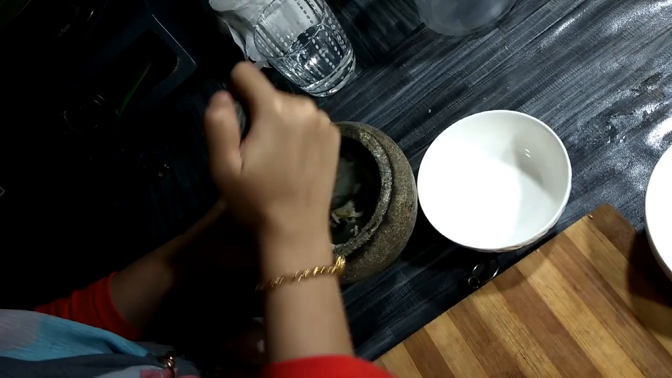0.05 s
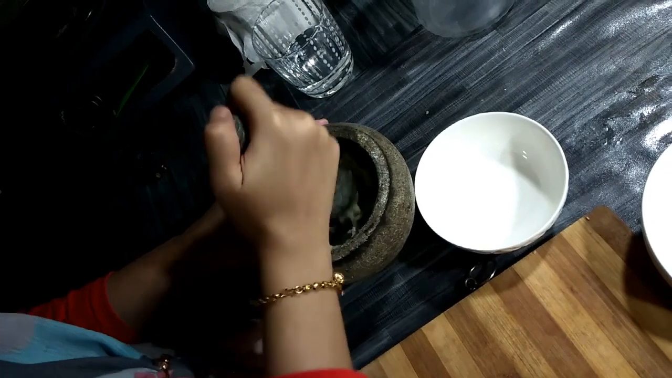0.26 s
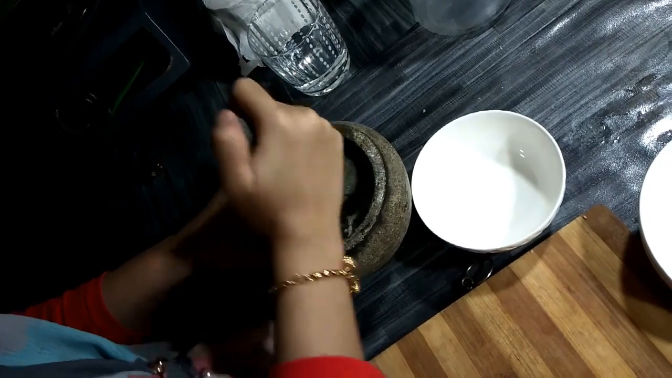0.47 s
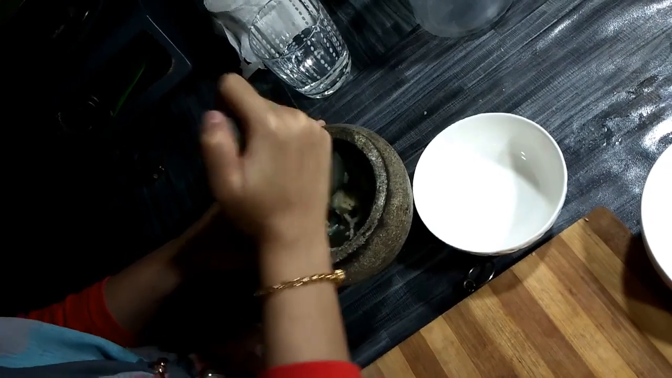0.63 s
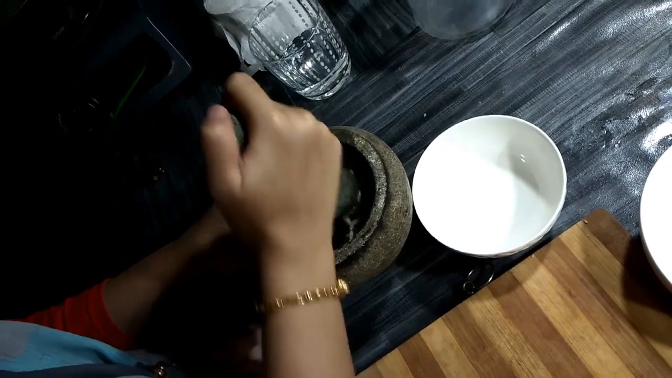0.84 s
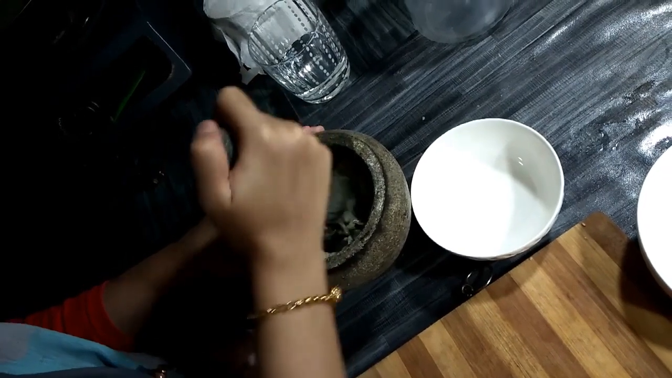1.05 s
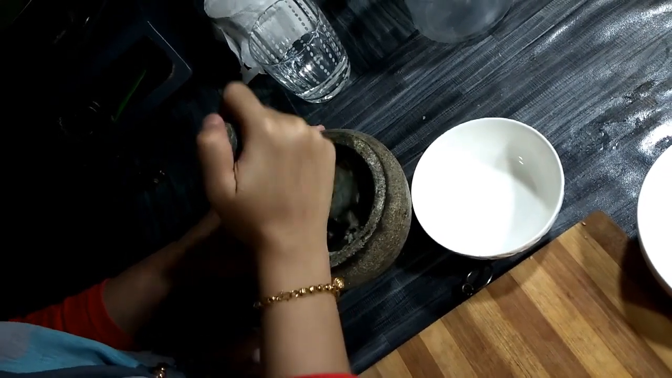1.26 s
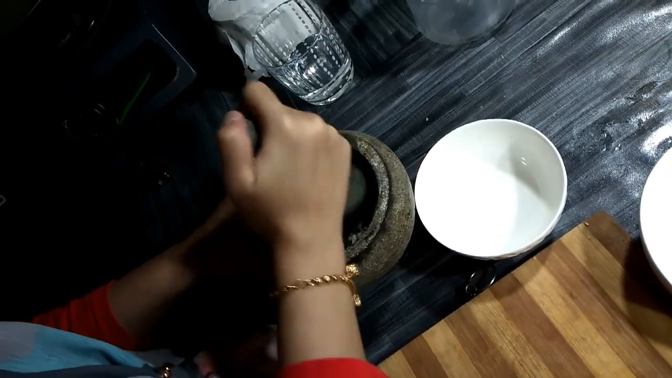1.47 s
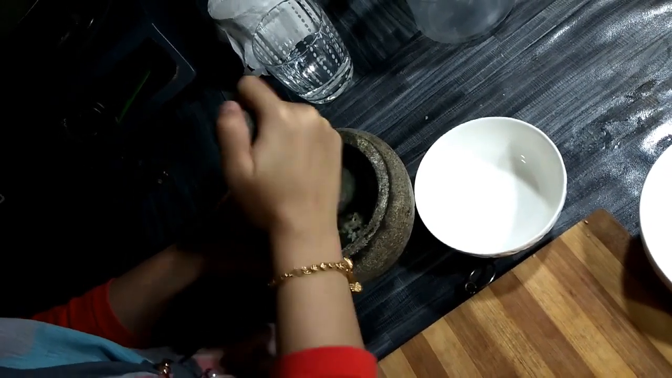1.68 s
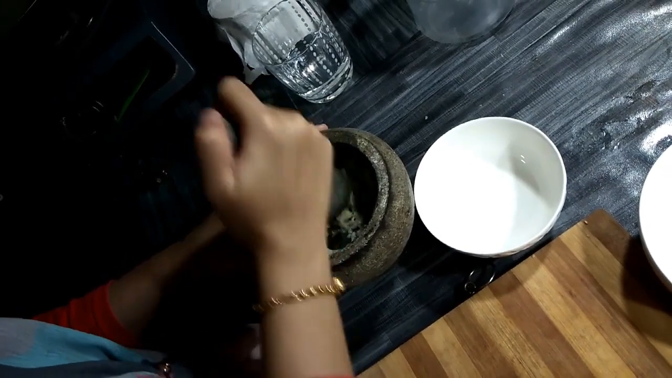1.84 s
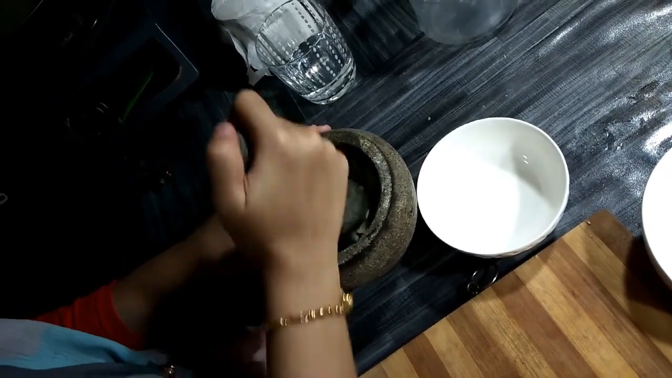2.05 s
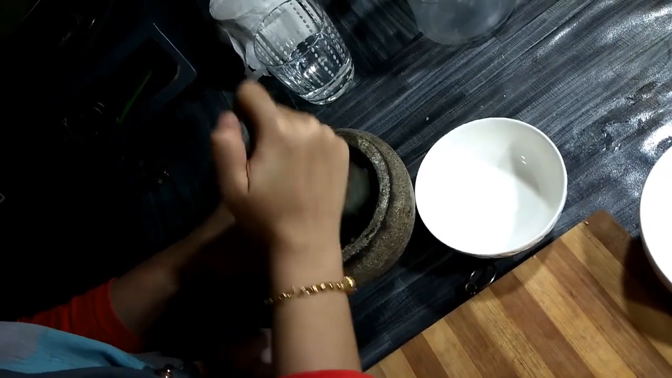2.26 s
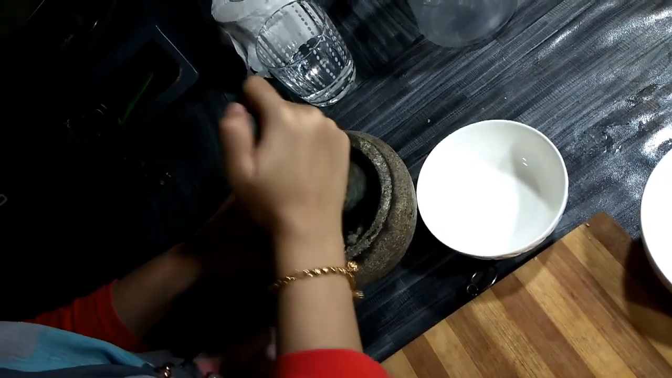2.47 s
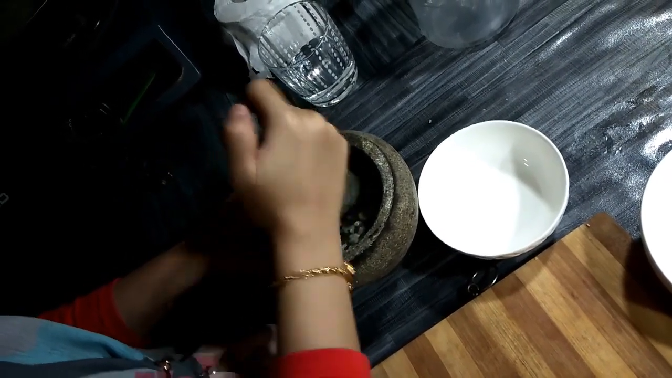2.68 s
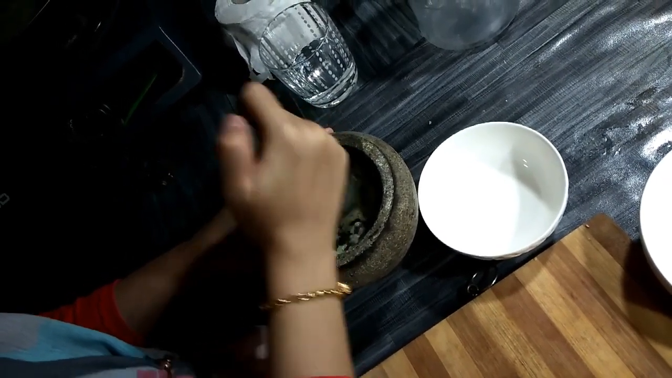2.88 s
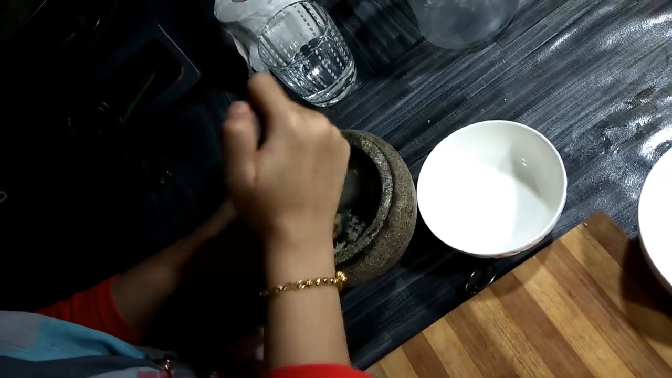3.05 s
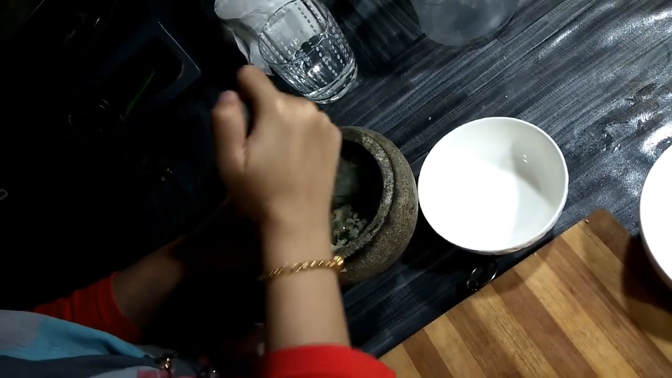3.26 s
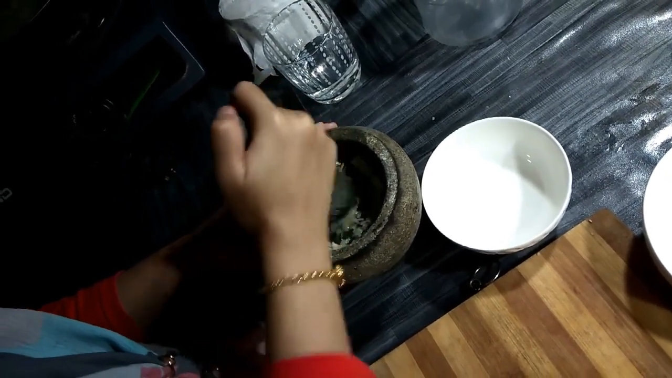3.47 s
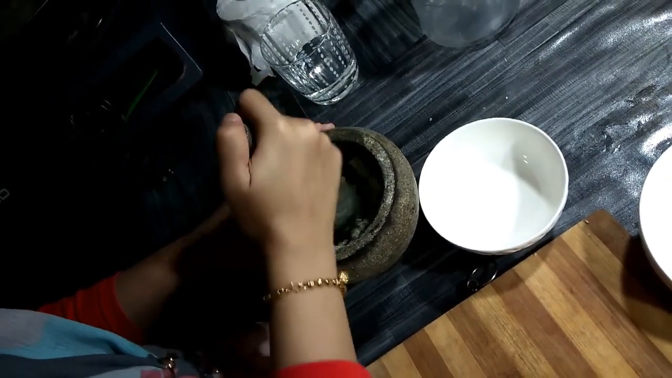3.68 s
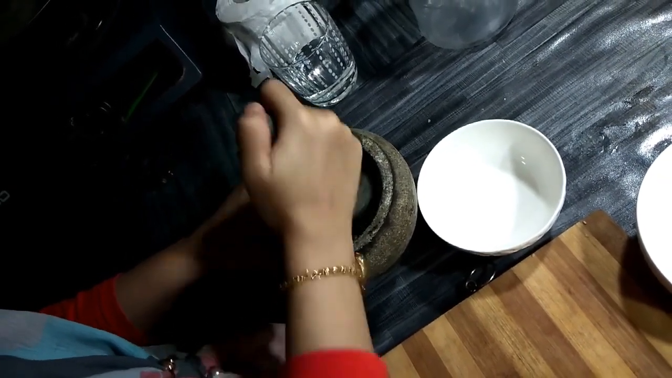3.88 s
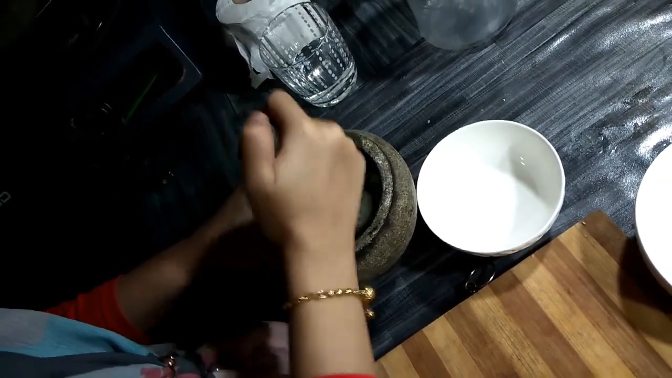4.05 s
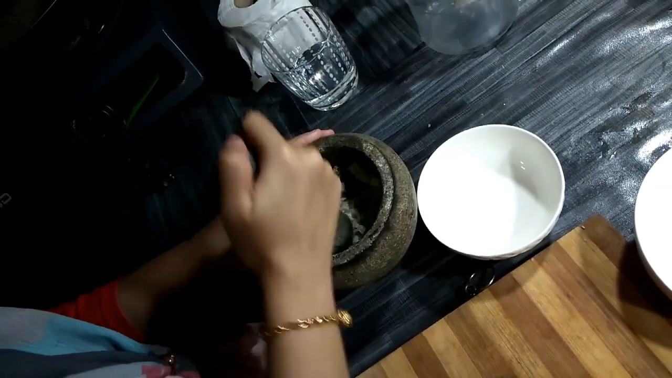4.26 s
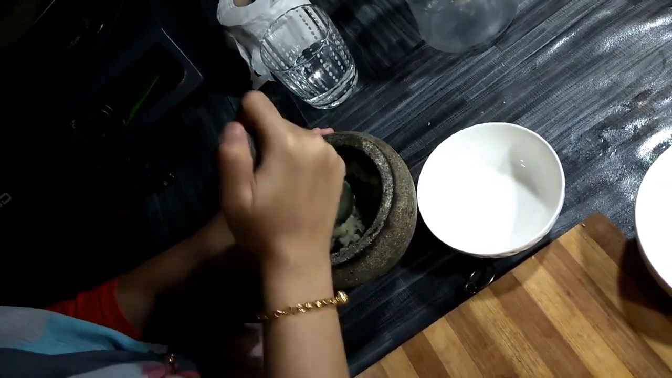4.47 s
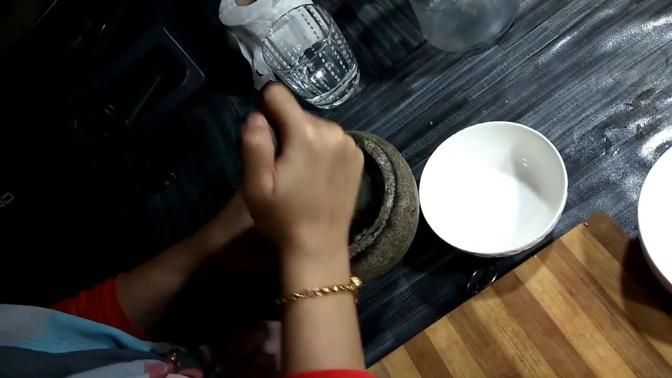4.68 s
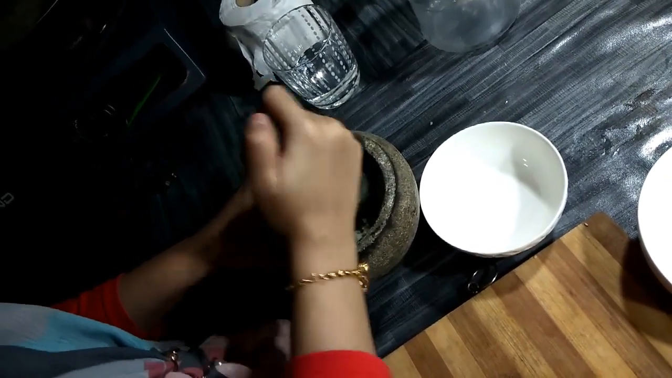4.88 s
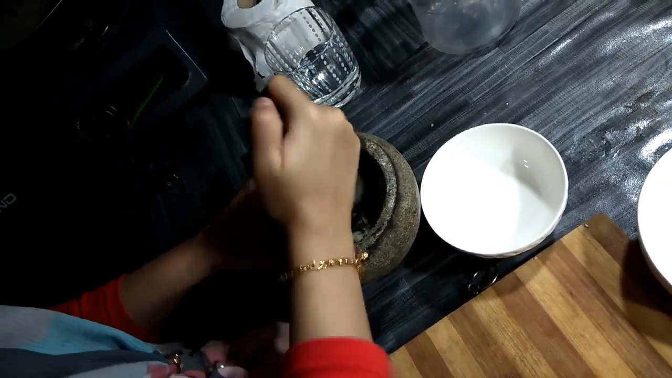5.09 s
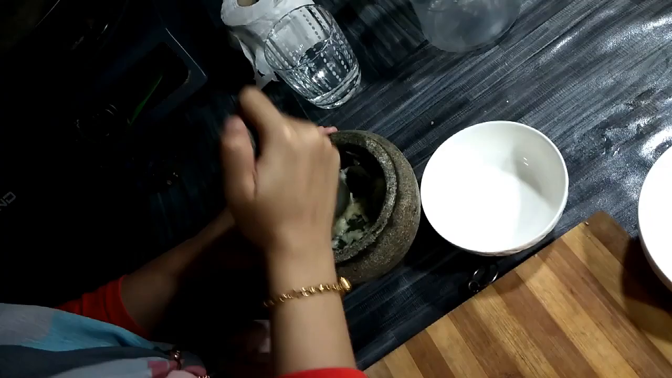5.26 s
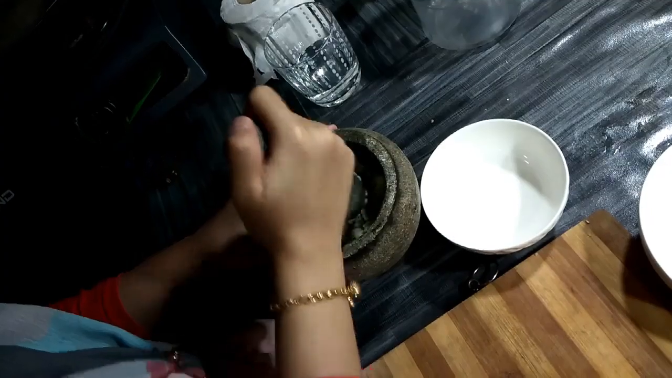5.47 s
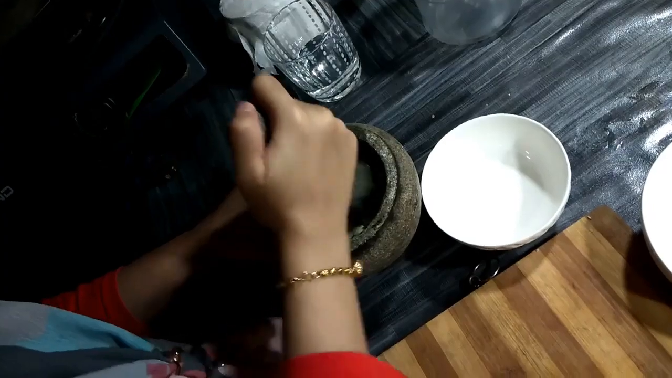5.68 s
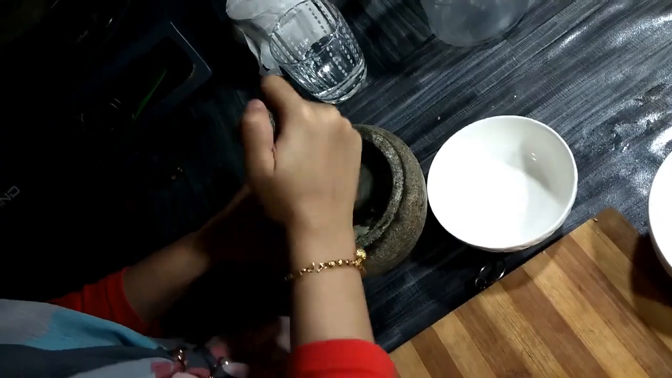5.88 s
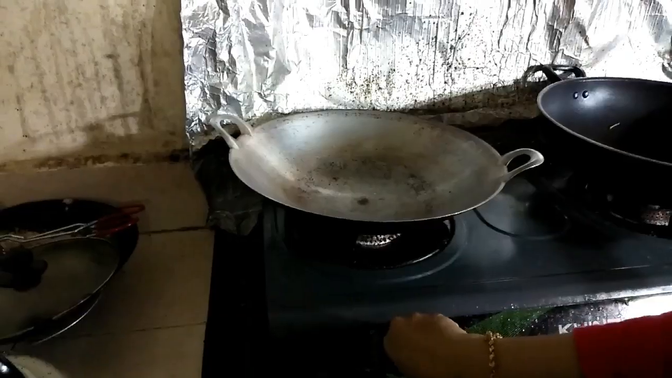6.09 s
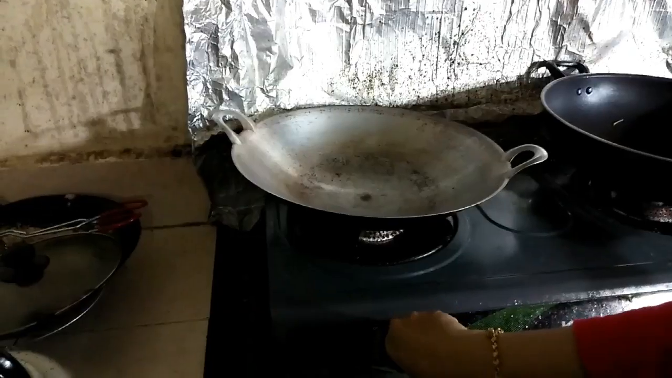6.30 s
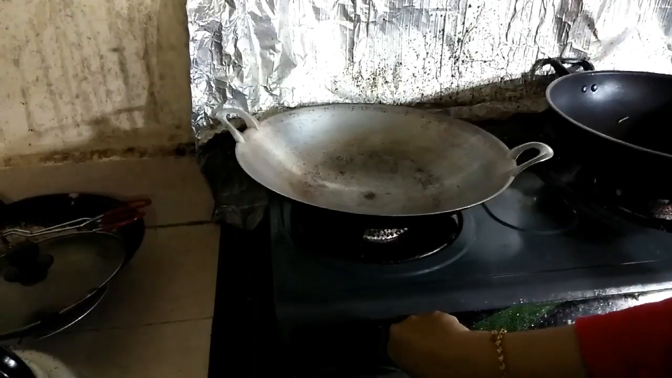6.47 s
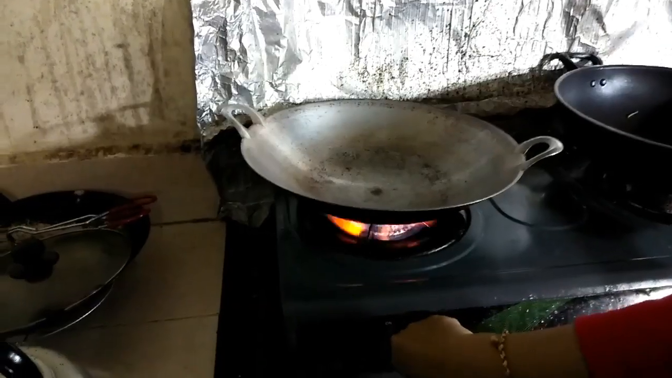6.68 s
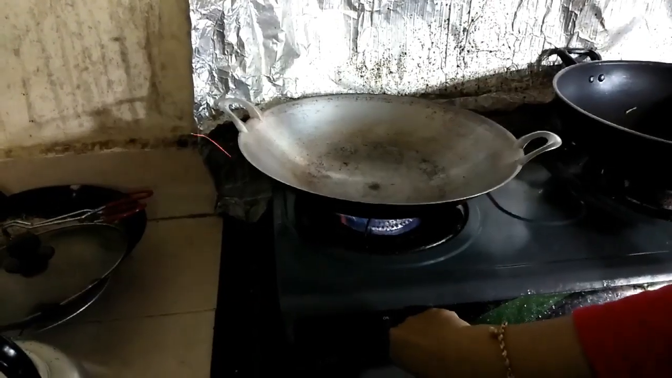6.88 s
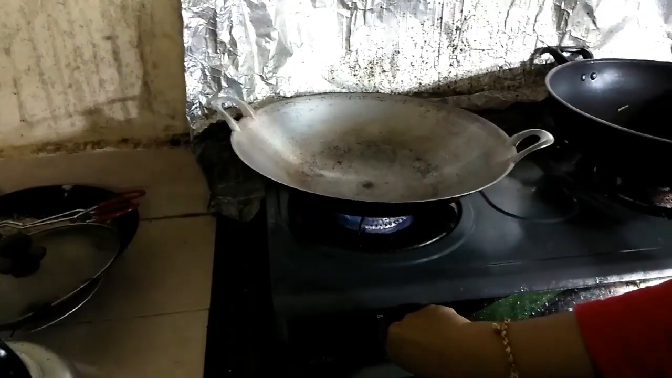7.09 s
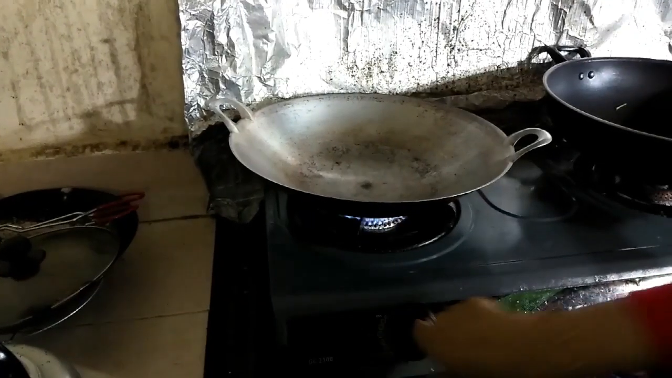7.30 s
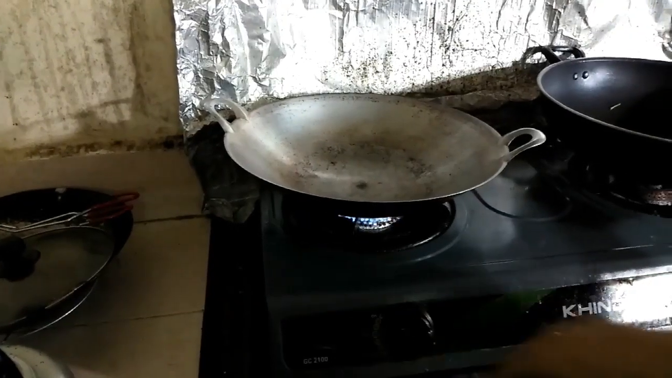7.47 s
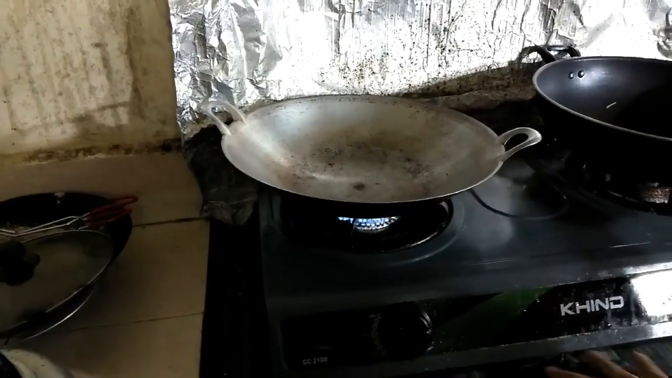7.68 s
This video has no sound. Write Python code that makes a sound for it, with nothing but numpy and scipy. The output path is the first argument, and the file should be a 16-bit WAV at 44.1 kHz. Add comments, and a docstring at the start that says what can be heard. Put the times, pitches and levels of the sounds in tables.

```python
"""Garlic mortar, then gas stove

Close at the table in a hard-walled kitchen, a pestle pounds garlic in a stone mortar, four strokes a second.
Each stroke is a noise crackle of pulp, a ringing table thud and a stone knock; a bracelet jingles after it.
The scene then cuts to the stove: the igniter snaps, the gas puffs and flares, the knob clacks and turns it down.
Shaped noise makes the hiss, flame and rattles; decaying sines make the rings; a faint whir runs throughout."""
import sys
import numpy as np
from scipy import signal
from scipy.fft import rfft, irfft, next_fast_len
from scipy.io import wavfile
from scipy.ndimage import map_coordinates

SR = 44100
rng = np.random.default_rng(int(sys.argv[2]) if len(sys.argv) > 2 else 0)


def inscribe(sig):
    """Save sig as 16-bit PCM at rate SR to the path in sys.argv[1].

    A 1-D sig is mono; a 2-D sig holds one channel per row.
    Samples are clipped to [-1, 1] before scaling.
    """
    pcm = np.round(np.clip(np.atleast_2d(sig).T, -1, 1) * 32767)
    wavfile.write(sys.argv[1], SR, pcm.astype(np.int16))


N = 341239

# Spectra are relative, since each noise is scaled to a set level; mode levels are relative within a body.
# steady hiss in both places: pitch_hz, density_db
HISS_SPECTRUM = [(25, -34), (60, -5), (100, 4), (150, 1.5), (280, -3.5), (500, -10.5), (1000, -17),
                 (1500, -10.5), (2300, -10), (3000, -11), (4000, -28), (5500, -18), (6300, -26),
                 (6800, -11.5), (7400, -24.5), (8300, -22.5), (10500, -36.5), (13500, -50), (15500, -41)]
# low drone that fills the room by the table: pitch_hz, density_db
DRONE_SPECTRUM = [(30, -3), (45, -7), (58, 32), (72, 15.5), (100, 10.5), (200, 24), (400, -46)]
# path of the whir by the stove: time_s, centre_hz
STOVE_WHIR_PATH = [(6.15, 1770), (6.49, 1942), (7.284, 1736), (7.738, 1820)]
# nearest kitchen walls: delay_s, relative_level_db
WALL_ECHOES = [(.0046, -9.5), (0.0116, -2.5), (0.011, -17.5), (0.0127, -11.5), (0.022, -14.5), (0.023, -53)]
# decay of the kitchen's diffuse tail: pitch_hz, t60_s
KITCHEN_DECAY = [(60, 0.88), (250, 0.6), (700, 0.57), (2000, 0.65), (4000, 0.56), (8000, 0.48),
                 (15000, 0.56)]
# gas catching light: pitch_hz, density_db
PUFF_SPECTRUM = [(40, -10), (65, -20), (110, 15), (160, -6), (400, -21), (1200, -50)]
# the burner's rush: pitch_hz, density_db
FLAME_SPECTRUM = [(35, -20), (60, 0), (150, -2), (330, 2.5), (520, -8.5), (700, 0), (900, -14),
                  (2000, -11.5), (5000, -41)]
# igniter and knob snaps at the stove: start_s, rattle_level_db, clack_level_db, rattle_cutoff_hz
STOVE_SNAPS = [(6.7336, -21, -42, 18000), (6.7429, -18.5, -51, 7000), (7.4369, -29, -29.5, 4100),
               (7.4472, -34.5, -28.5, 2500)]
# loose parts of the stove: pitch_hz, density_db
RATTLE_SPECTRUM = [(40, -25), (110, -24), (250, -6), (600, -7), (1400, 1), (2500, 2), (3300, -4),
                   (5200, -7.5), (8200, -3.5), (10500, -11), (13500, -24), (15500, -24)]
# the knob's hollow plastic clack: pitch_hz, density_db
KNOB_SPECTRUM = [(500, -27), (950, -34), (1300, -9), (1600, -2.5), (1850, 8), (2100, -4), (2700, -3),
                 (3700, -11.5), (5000, -56)]
# the stove's sheet steel: pitch_hz, level_db, t60_s
STEEL_MODES = [(998, -5, .09), (1798, 0, .03), (1940, -1, .025)]
# jolts that make the china bowl chime: start_s, level_db
CHINA_JOLTS = [(0.556, -50.5), (4.967, -38.5)]
# the china bowl next to the mortar: pitch_hz, level_db, t60_s
CHINA_MODES = [(1252, 0, .55), (3130, -9, .3)]
# the bracelet's small bell: pitch_hz, level_db, t60_s
BELL_MODES = [(2720, -9, .06), (3580, -15, .08), (4690, 0, .1), (4750, -4, .09), (5980, -8, .08),
              (7600, -13, .06), (9200, -16, .05), (12060, -19, .07), (14450, -21, .06)]
# the bell's clapper strikes twice after each landing: delay_s, relative_level_db
CLAPPER_STRIKES = [(.029, 9), (.042, 0.5)]
# the bracelet's chain links: pitch_hz, level_db, t60_s
LINK_MODES = [(5470, -2, .1), (8080, 0, .09)]
# pestle strokes, levels before each layer's trim:
# landing_s, crunch_level_db, thud_level_db, knock_level_db, contact_hardness_hz
PESTLE_STROKES = [ (.050, -40.5, -28, -51, 556), (0.293, -62, -30, -45, 543),
                  (0.5562, -42, -29.5, -45, 503.8), (.815, -44, -29, -30, 1660),
                  (1.060, -43.5, -27, -38, 564), (1.294, -41.5, -27, -23, 1790),
                  (1.540, -43.5, -29.5, -43, 533), (1.773, -42, -36, -60, 506), (2.039, -42, -26, -31, 850),
                  (2.283, -34.5, -33, -28.5, 4370), (2.527, -42, -31.5, -43.5, 700),
                  (2.787, -37.5, -28.5, -42, 570), (3.053, -40.5, -27.5, -46, 560),
                  (3.2847, -37, -29.5, -39.5, 500), (3.504, -44.5, -30.5, -35, 600),
                  (3.723, -57, -31.5, -26.5, 1280), (3.968, -40, -27.5, -39, 593.3),
                  (4.1965, -43, -36.5, -44, 2750), (4.414, -47, -32.5, -39.5, 2730),
                  (4.705, -41, -26.5, -29, 2362), (4.968, -40.5, -32, -48.5, 2330),
                  (5.2236, -38.5, -30, -47, 510), (5.485, -42, -27.5, -24.5, 2150),
                  (5.7275, -37, -28.5, -24.5, 2360), (5.969, -43.5, -29, -36, 584)]
# bursting garlic: pitch_hz, density_db
CRUSH_SPECTRUM = [(300, -49), (1200, 0.5), (2500, 0.5), (4200, -7), (5800, -2.5), (7100, 0.5), (8200, -3),
                  (10500, -9), (13000, -20.5), (15500, -15.5)]
# the table under the mortar: pitch_hz, level_db, t60_s
TABLE_MODES = [(60.7, 1, 0.37), (75, 3, 0.097), (106.5, 0.5, 0.17), (140, -3.5, 0.35), (163.2, -35, 1),
               (231.2, -11, 0.51), (296, -33, 0.13)]
# the table top shuddering under the rocking mortar: pitch_hz, density_db
SHUDDER_SPECTRUM = [(70, -12), (150, 3.5), (240, -3), (330, 3.5), (420, -16.5), (490, -7.5), (700, -21.5),
                    (1000, -20.5), (2000, -56)]
# the dense, dead clack of stone on stone: pitch_hz, density_db
CLACK_SPECTRUM = [(40, -6.5), (130, -1.5), (290, 0), (550, -3.5), (760, 1.5), (1080, -4.5), (1300, 0.5),
                  (1800, 2), (2050, 1), (2450, 3.5), (2620, -1), (3200, -5), (3450, -20), (12000, -17.5)]
# brief ring of mortar and pestle: pitch_hz, level_db, t60_s
STONE_MODES = [(277.96, -8, 0.052), (671.3, -7, 0.11), (793, -6, 0.1), (885, -17, 0.04), (1273, 2, 0.066),
               (1423, 10, 0.02), (1930, -17, 0.046), (2016, 0.5, 0.061), (2211, 13.5, 0.016),
               (2314, 11, 0.046), (2490, -1, 0.07), (2700, -15, 0.13)]

STOVE_S = 6.13  # the scene moves from table to stove
TOP_HZ = 15700  # microphone's band limit
# the whir by the table: centre, random wander as a share of it, knots a second in the wander, level
WHIR_HZ, WHIR_WANDER, WANDER_PER_S, WHIR_DB = 1610, 0.043, 3.22, -49.5
STOVE_WHIR_DB = -51.5
# the flame: mean steady level, extra level of the flare, rise and settling times
FLAME_DB, FLARE_DB, CATCH_S, SETTLE_S = -48.5, 18.5, 0.025, 0.11
# the last snap turns the gas down by this much, with this time constant
TURN_DOWN_DB, TURN_DOWN_S = 12, .12
# the bell: level under an ordinary thud, and the dB it gains for each dB of thud
BELL_DB, ORDINARY_THUD_DB, BELL_GROWS = -62.5, -28.5, 2.8
# chain tinkles: mean level and random spread
LINKS_DB, LINKS_SPREAD_DB = -68, 3.5
TRAVEL_S = .0028  # the pestle's way through the garlic; thuds weaker than ordinary shorten it
ROCK_S = 0.02933  # the mortar rocks back onto the table this long after a landing
# crunch cutoff at an ordinary level, and dB of cutoff per dB of crunch: a firm clove breaks louder and brighter
CRISP_HZ, ORDINARY_CRUNCH_DB, CRISP_GROWS = 8600, -41.5, 2.9


def amp(db):
    """Decibels to gain."""
    return 10 ** (np.asarray(db) / 20)


def unit(x):
    """Scale to rms 1."""
    return x / np.sqrt(np.mean(x ** 2) + 1e-20)


def burst(x):
    """Scale a short sound to the energy of a twentieth of a second at rms 1."""
    return x / np.sqrt(np.sum(x ** 2) * 20 / SR + 1e-20)


def along(points, hz):
    """Read (Hz, value) points on a log-frequency axis."""
    point_hz, value = np.transpose(points)
    return np.interp(np.log(hz + 1), np.log(point_hz), value)


def add(track, s, x):
    """Mix x into the track at time s."""
    part = track[max(round(s * SR), 0):][:len(x)]
    part += x[:len(part)]


def noise(spectrum, size):
    """Coloured noise of rms 1."""
    m = next_fast_len(size)
    gain = amp(along(spectrum, np.fft.rfftfreq(m, 1 / SR)))
    white = rfft(rng.standard_normal(m))
    return unit(irfft(white * gain, m)[:size])


def lowpass(x, hz, order):
    """Causal low-pass."""
    sections = signal.butter(order, min(hz, .45 * SR), fs=SR, output="sos")
    return signal.sosfilt(sections, x)


def wobble(rate):
    """A smooth random curve, rate knots a second."""
    knots = rng.standard_normal(400)
    return map_coordinates(knots, [np.arange(N) * rate / SR], mode="mirror")


def click(spectrum):
    """The most compact causal pulse with the given spectrum: minimum phase, by folding the cepstrum."""
    size = SR // 2
    log_gain = np.log(amp(along(spectrum, np.fft.rfftfreq(size, 1 / SR))))
    cepstrum = irfft(log_gain, size)
    cepstrum[1:size // 2] *= 2
    cepstrum[size // 2:] = 0
    return burst(irfft(np.exp(rfft(cepstrum)), size))


def ring(modes, scatter_db, detune):
    """One blow on a body: decaying sines whose strengths and pitches vary with the spot that is struck."""
    hz, db, t60 = np.transpose(modes)[:, :, None]
    t = np.arange(int(SR * t60.max())) / SR
    size, shift = rng.standard_normal((2, len(modes), 1))
    decay = amp(db + scatter_db * size - 60 * t / t60)
    tones = np.sin(2 * np.pi * hz * (1 + detune * shift) * t)
    return burst(np.sum(decay * tones, axis=0))


def kitchen(x, early_db, tail_db):
    """Direct sound, the nearest walls, and a diffuse noise tail whose deepest bass lasts longest."""
    hz, t, z = signal.stft(rng.standard_normal(SR), SR, nperseg=256)
    decay = amp(-60 * t / along(KITCHEN_DECAY, hz)[:, None])
    tail = signal.istft(z * decay, SR, nperseg=256)[1]
    # the tail swells in over the first hundredths of a second
    tail = tail * (1 - np.exp(-(np.arange(len(tail)) / SR / 0.013) ** 2))
    response = amp(tail_db) * tail / np.linalg.norm(tail)
    response[0] += 1
    for delay, db in WALL_ECHOES:
        response[round(delay * SR)] += amp(db + early_db)
    return signal.fftconvolve(x, response)[:len(x)]


def background(width_hz, upper_ratio, upper_width_hz, upper_db):
    """Steady hiss and 100 Hz hum, with a whir of two noise resonances that move together."""
    t = np.arange(N) / SR
    by_table = t < STOVE_S
    table_hz = WHIR_HZ * (1 + WHIR_WANDER * wobble(WANDER_PER_S))
    stove_hz = np.interp(t, *np.transpose(STOVE_WHIR_PATH))
    centre_hz = np.where(by_table, table_hz, stove_hz)
    hz, frames, z = signal.stft(rng.standard_normal(N), SR, nperseg=1024)
    centre = np.interp(frames, t, centre_hz)

    def peak(at, width):
        """A resonance curve."""
        return 1 / (1 + ((hz[:, None] - at) / width) ** 2)

    shape = peak(centre, width_hz) + amp(upper_db) * peak(centre * upper_ratio, upper_width_hz)
    whir = unit(signal.istft(z * shape, SR, nperseg=1024)[1][:N])
    whir = whir * amp(np.where(by_table, WHIR_DB, STOVE_WHIR_DB))
    hiss = noise(HISS_SPECTRUM, N) * amp(np.where(by_table, -50.5, -53.5))
    hum = amp(-53.5) * np.sin(2 * np.pi * 100 * t)
    return whir + hiss + hum


def drone():
    """Low coloured noise that fills the room by the table."""
    return amp(-59.0) * noise(DRONE_SPECTRUM, N)


def flame():
    """Gas catches with a low puff and flares, settles to a soft, fluttering rush, and is turned down."""
    t = np.arange(N) / SR
    lit = np.maximum(t - STOVE_SNAPS[0][0], 0)
    lowered = np.maximum(t - STOVE_SNAPS[-1][0], 0)
    puff_shape = (1 - np.exp(-lit / 0.021)) * np.exp(-lit / 0.062)
    puff = noise(PUFF_SPECTRUM, N) * amp(-28) * puff_shape
    flare_db = FLARE_DB * np.exp(-lit / SETTLE_S)
    turned_down_db = TURN_DOWN_DB * (1 - np.exp(-lowered / TURN_DOWN_S))
    flutter_db = 2.1 * wobble(14)
    level = amp(FLAME_DB + flare_db - turned_down_db + flutter_db)
    rush = noise(FLAME_SPECTRUM, N) * (1 - np.exp(-lit / CATCH_S)) * level
    return puff + rush


def stove():
    """The sprung igniter and the knob snap: loose parts rattle, the knob clacks, the steel rings briefly."""
    out, t = np.zeros(N), np.arange(SR // 4) / SR
    for s, rattle_db, clack_db, bright_hz in STOVE_SNAPS:
        rattle_shape = np.exp(-t / 0.0094) * (1 - np.exp(-t / 0.0013))
        rattle = burst(noise(RATTLE_SPECTRUM, len(t)) * rattle_shape)
        knob = burst(noise(KNOB_SPECTRUM, len(t)) * np.exp(-t / 0.0061))
        add(out, s, amp(rattle_db) * lowpass(rattle, bright_hz, order=1))
        add(out, s, amp(clack_db + 2.5) * knob)
        add(out, s, amp(clack_db - 3.5) * ring(STEEL_MODES, scatter_db=0, detune=0))
    return kitchen(out, early_db=-17, tail_db=-7.0)


def china_bowl(out):
    """A jolt makes the china bowl next to the mortar chime in its two modes."""
    for s, db in CHINA_JOLTS:
        add(out, s, amp(db) * ring(CHINA_MODES, scatter_db=0, detune=0))


def bracelet(out):
    """Heavier thuds shake the small bell harder; the chain links tinkle while the hand lifts."""
    t = np.arange(SR // 16) / SR
    for s, _, thud_db, *_ in PESTLE_STROKES:
        bell_db = BELL_DB + BELL_GROWS * (thud_db - ORDINARY_THUD_DB)
        for lag, db in CLAPPER_STRIKES:
            tick = burst(noise(CRUSH_SPECTRUM, len(t)) * np.exp(-t / 0.0097))
            jingle = ring(BELL_MODES, scatter_db=4, detune=0.0028)
            add(jingle, 0, amp(-7.5) * tick)
            add(out, s + lag + 0.0014 * rng.normal(), amp(bell_db + db) * jingle)
        tinkle_db = LINKS_DB + LINKS_SPREAD_DB * rng.normal()
        tinkle = ring(LINK_MODES, scatter_db=9, detune=.005)
        add(out, s + rng.uniform(.08, .21), amp(tinkle_db) * tinkle)


def trinkets():
    """The bracelet and the china bowl sound by the mortar, with the kitchen around them."""
    out = np.zeros(N)
    bracelet(out)
    china_bowl(out)
    return kitchen(out, early_db=-32, tail_db=-10)


def crunch(rise, fall, grain):
    """Garlic cells burst in a dense crackle that peaks after 10 ms."""
    t = np.arange(SR // 8) / SR - .01
    pressure = np.exp(np.minimum(t, 0) / rise - np.maximum(t, 0) / fall)
    # each cell holds one random strength for 16 samples
    cells = np.repeat(np.exp(grain * rng.standard_normal(len(t))), 16)[:len(t)]
    return burst(noise(CRUSH_SPECTRUM, len(t)) * pressure * cells)


def shudder():
    """The mortar chatters on the table for about a twentieth of a second after it is hit."""
    t = np.arange(SR // 5) / SR
    shape = (1 - np.exp(-t / 0.0024)) / (1 + (t / 0.038) ** 4)
    return burst(noise(SHUDDER_SPECTRUM, len(t)) * shape)


def mortar_bowl(x, bounce_s, bounce):
    """Bounces in the bowl spread a blow over milliseconds without colouring it: an all-pass, one second long."""
    lap = np.exp(-2j * np.pi * np.fft.rfftfreq(SR, 1 / SR) * bounce_s)
    return irfft(rfft(x, SR) * (lap - bounce) / (1 - bounce * lap), SR)


def pounding():
    """The pestle crushes the garlic, then lands: a cushion of pulp dulls the knock, bare stone sharpens it."""
    crush, thud, knock = np.zeros((3, N))
    clack = click(CLACK_SPECTRUM)
    for s, crunch_db, thud_db, knock_db, hard_hz in PESTLE_STROKES:
        travel = TRAVEL_S * min(amp(thud_db - ORDINARY_THUD_DB), 1)
        first_touch = s - travel - .0095  # lead-in to the crackle's peak
        crisp_hz = CRISP_HZ * amp(CRISP_GROWS * (crunch_db - ORDINARY_CRUNCH_DB))
        crisp = lowpass(crunch(rise=.0008, fall=.0024, grain=.3), crisp_hz, order=1)
        squish = lowpass(crunch(rise=0.002, fall=0.022, grain=0.57), 4700, order=1)
        add(crush, first_touch, amp(crunch_db - 4) * crisp)
        add(crush, first_touch, amp(thud_db - 18.5) * squish)

        push = lowpass(ring(TABLE_MODES, scatter_db=2.0, detune=0.023), 181, order=2)
        add(thud, s, amp(thud_db - 3.0) * push)
        add(thud, s + ROCK_S, amp(thud_db - 3.5) * push)
        add(thud, s, (amp(thud_db - 9.5) + amp(knock_db - 8.0)) * shudder())

        stone = clack.copy()
        add(stone, 0, amp(-5.5) * ring(STONE_MODES, scatter_db=6, detune=0.015))
        blow = mortar_bowl(lowpass(stone, hard_hz, order=4), bounce_s=.00135, bounce=0.59)
        # each knock gets a freshly drawn diffuse tail
        add(knock, s, amp(knock_db + 1.5) * kitchen(blow, early_db=-2.5, tail_db=-3.5))
    crush = kitchen(crush, early_db=-4, tail_db=-6.0)
    thud = kitchen(thud, early_db=-6, tail_db=-11)
    return crush + thud + knock


def scene():
    """The table's sounds stop as the scene moves to the stove; the hiss, hum and whir run through both."""
    at_table = np.clip((STOVE_S - np.arange(N) / SR) * 200, 0, 1)  # 5 ms fade
    room = background(width_hz=130, upper_ratio=1.877, upper_width_hz=250, upper_db=-8.0)
    table = drone() + trinkets() + pounding()
    return (room + flame() + stove() + table * at_table)[None]


def record(dry):
    """The microphone loses the deepest bass and keeps nothing above its band limit."""
    x = signal.sosfilt(signal.butter(2, 38, "high", fs=SR, output="sos"), dry)
    m = next_fast_len(N + SR // 2)
    in_band = np.fft.rfftfreq(m, 1 / SR) < TOP_HZ
    return irfft(rfft(x, m) * in_band, m)[..., :N]


dry = scene()
out = record(dry)
inscribe(out)
```